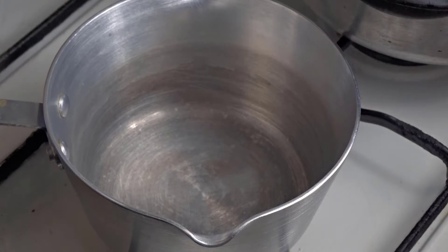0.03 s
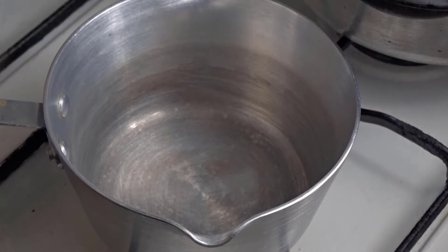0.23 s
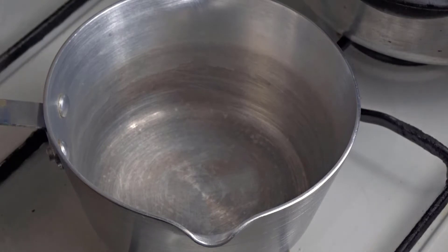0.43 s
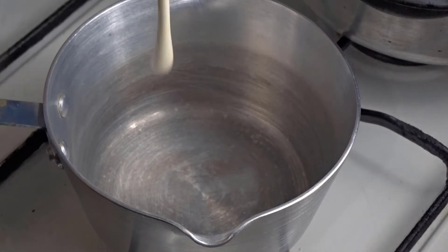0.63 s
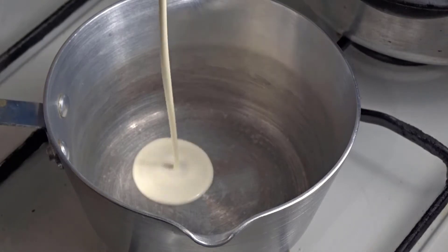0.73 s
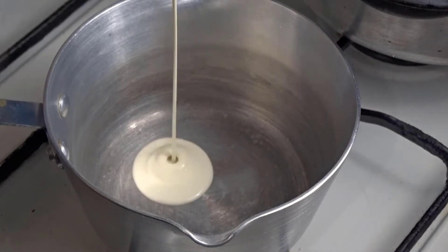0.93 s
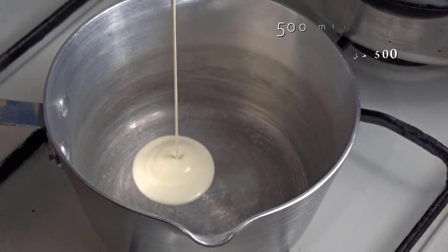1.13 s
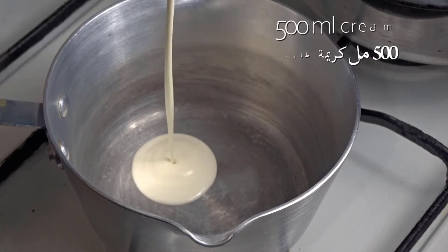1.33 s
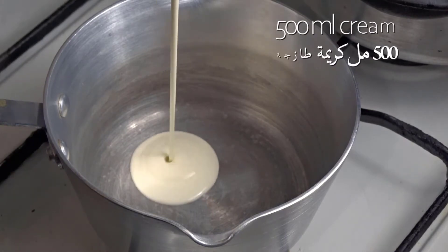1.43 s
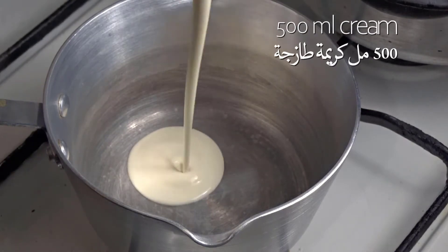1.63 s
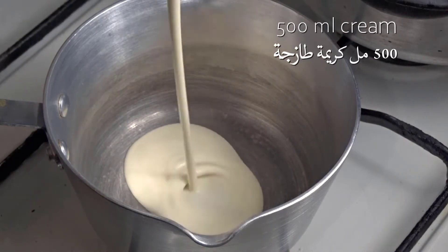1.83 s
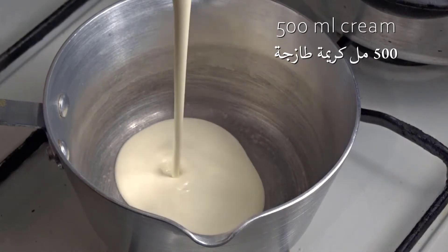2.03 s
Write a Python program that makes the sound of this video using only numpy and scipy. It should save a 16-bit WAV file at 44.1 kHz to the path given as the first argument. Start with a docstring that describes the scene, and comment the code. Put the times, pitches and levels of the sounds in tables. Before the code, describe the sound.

Cream pours into a steel pan, heard close up in a quiet kitchen. Cookware first clinks sharply at about 0.2 and 0.4 seconds, dragging briefly after each touch. From 0.6 seconds the cream patters softly with small bubble plops and wet ticks, growing fainter after 1.5 seconds. Light metal knocks come near 0.7 and 1 second. Steady fan-like noise and a low hum lie underneath.

```python
"""Cream poured into a steel pan

Close up in a quiet kitchen, cream patters into a pan: trapped bubbles plop, small ones tick.
Metal cookware clinks twice, drags briefly after each touch, then knocks lightly twice.
The metal sets off a microphone ring near 8.5 kHz. Fan-like noise and a low hum lie underneath."""
import sys
import numpy as np
from scipy import signal
from scipy.fft import rfft, irfft
from scipy.io import wavfile
from scipy.ndimage import uniform_filter1d

SR = 44100
rng = np.random.default_rng(int(sys.argv[2]) if len(sys.argv) > 2 else 0)


def generate_wav(sig):
    """Save sig (samples, or channels by samples) to the path in sys.argv[1] as 16-bit PCM at SR."""
    pcm = np.round(np.clip(np.atleast_2d(sig).T, -1, 1) * 32767).astype(np.int16)
    wavfile.write(sys.argv[1], SR, pcm)


N = 92610


# stream patter: time_s, level_db
POUR_LEVEL = [(.6, -64), (.67, -57.5), (.78, -60.5), (.95, -61.5), (1.05, -57.5), (1.2, -63.5),
              (1.38, -62.5), (1.55, -68), (2.1, -70)]
# pan resonances under the stream: centre_hz, width_hz, gain_db
POUR_RESONANCES = [(312, 120, 4.5), (475, 280, -1), (680, 210, -1), (1470, 520, -6.5), (3030, 640, -22)]
def pour():
    """Tiny splashes of thick cream excite the pan."""
    return excite(POUR_LEVEL, POUR_RESONANCES)


# plops: start_s, bubble_db, pitch_hz, t60_s, rise_s, splat_db
PLOP_EVENTS = [(0.2371, -39.5, 1394, .025, 0.0024, -47), (0.656, -46.5, 1615, 0.052, 0.0023, -56),
               (.760, -48, 1570, .03, 0.0025, -60), (1.169, -42, 1400, 0.032, 0.0011, -40.5),
               (1.21, -60, 1090, 0.035, 0.0025, -47.5), (1.3353, -35, 1484, 0.027, 0.0043, -47.5),
               (1.502, -54, 1500, 0.033, .002, -52)]
# pan floor modes, damped by cream: pitch_hz, gain_db, t60_s
PAN_MODES = [(436, 0.5, 0.031), (760, 4, 0.012), (1117, 7.5, 0.025), (1820, 0, 0.018)]
# splat spectrum: freq_hz, gain_db
SPLAT_SPECTRUM = [(60, -22), (250, 0), (450, -6.5), (900, -2), (1300, 3), (2500, -23), (4000, -19),
                  (8000, -45)]
def plops():
    """A trapped bubble rings in froth as the cream splats on the pan floor."""
    out = np.zeros(N)
    for start_s, bubble_db, pitch_hz, t60_s, rise_s, splat_db in PLOP_EVENTS:
        froth = hump(pitch_hz, octaves=0.13, skirt_db=-14)
        add(out, start_s, ring([(pitch_hz, bubble_db, t60_s)], rise_s))
        add(out, start_s, amp(bubble_db - 2) * burst(froth, t60_s, rise_s))
        add(out, start_s, amp(splat_db) * ring(PAN_MODES, rise_s))
        add(out, start_s, amp(splat_db - 2) * burst(spectrum(SPLAT_SPECTRUM), t60_s=0.09, rise_s=rise_s))
    return out


# wet ticks: start_s, gain_db, centre_hz
TICK_EVENTS = [(0.2081, -37.5, 2400), (0.2307, -34, 8500), (0.271, -44, 10300), (0.727, -43.5, 8060),
               (.766, -40, 7600), (.779, -49, 5930), (0.7995, -45, 8100), (.9437, -46.5, 8000),
               (1.0245, -47, 8200), (1.0504, -43, 8100), (1.0999, -32.5, 7600), (1.187, -44.5, 5400),
               (1.203, -49, 7000), (1.247, -52, 4900), (1.392, -45, 8150), (1.8292, -43, 7950),
               (2.0336, -43.5, 8500)]
def ticks():
    """Small bubbles tick, each with a faint tail."""
    out = np.zeros(N)
    for start_s, gain_db, centre_hz in TICK_EVENTS:
        colour = hump(centre_hz, octaves=0.25, skirt_db=-18)
        add(out, start_s, amp(gain_db - 1.5) * burst(colour, t60_s=0.01, rise_s=0.00074))
        add(out, start_s, amp(gain_db - 19) * burst(colour, t60_s=0.073, rise_s=0.0022))
    return out


# modes of the two points struck, plus the microphone's 8.5 kHz ring: pitch_hz, level_db, t60_s
FIRST_MODES = [(1090, -41, 0.057), (2530, -49, 0.02), (3410, -31, 0.027), (3755, -33.5, 0.036),
               (4810, -32, 0.029), (5770, -40, 0.056), (6980, -38, .04), (8060, -31, .03),
               (8495, -15.5, 0.04), (9200, -38, .025), (12800, -42, .04)]
SECOND_MODES = [(814, -35.5, 0.033), (929, -37, 0.046), (1487, -44, 0.063), (2490, -41, .04),
                (3074, -34.5, 0.098), (3780, -35.5, 0.047), (4680, -31, 0.021), (4773, -27, 0.028),
                (5900, -36.5, 0.039), (7660, -32, .03), (8580, -13.5, 0.024), (8400, -29, 0.016),
                (9630, -24, 0.019), (10920, -33, 0.025), (12650, -31, 0.02)]
# crack spectra: freq_hz, gain_db
FIRST_SPECTRUM = [(60, -45), (250, -13), (1000, 0.5), (1400, -14), (2200, 0), (2800, -4.5), (3500, 0),
                  (4200, -6.5), (4900, 3.5), (6200, -8), (7300, 0.5), (9500, 1.5), (11400, -18),
                  (12700, -17), (16000, -25)]
SECOND_SPECTRUM = [(60, -40), (350, -7), (850, 1), (1250, -13), (1900, -14), (3000, -16), (4800, -1.5),
                   (6300, -6), (7600, 5), (9900, 6), (11000, 0), (12500, 2), (13500, -5), (16000, -2)]
# clinks: start_s, crack_db, crack_t60_s, ring_gain_db, ring_rise_s
CLINK_EVENTS = [(0.1529, -25.5, 0.026, 1, 0.0058), (.3713, -22.5, 0.019, -0.5, 0.0024)]
# bounces of the second clink: start_s, gain_db
CHATTER = [(.3825, -31), (0.3863, -16.5), (0.3996, -21)]
def clinks():
    """Struck metal cracks, rattles, rings and sets off the microphone's ring; clink two chatters."""
    out = np.zeros(N)
    points = [(spectrum(FIRST_SPECTRUM), FIRST_MODES), (spectrum(SECOND_SPECTRUM), SECOND_MODES)]
    for event, (colour, modes) in zip(CLINK_EVENTS, points):
        start_s, crack_db, crack_t60_s, ring_gain_db, ring_rise_s = event
        crack = burst(colour, crack_t60_s, rise_s=0.00026)
        rattle = amp(-20) * burst(colour, t60_s=0.12, rise_s=0.004)
        add(out, start_s, amp(crack_db) * (crack + rattle))
        add(out, start_s, amp(ring_gain_db) * ring(modes, ring_rise_s))
    for start_s, gain_db in CHATTER:
        add(out, start_s, amp(gain_db) * ring(SECOND_MODES, rise_s=0.0025))
    return out


# drag after the first clink, scrape after the second: time_s, level_db
DRAG_LEVEL = [(.155, -67), (.165, -52), (.187, -46), (.2, -54), (.215, -49.5), (.25, -55.5), (.275, -54.5),
              (.3, -50.5), (.33, -56.5), (.365, -57)]
SCRAPE_LEVEL = [(.372, -63), (.38, -48), (.405, -47.5), (.43, -52), (.447, -44.5), (.47, -48.5),
                (.495, -47.5), (.515, -43), (.54, -46.5), (.565, -58), (.62, -71)]
# scraped metal resonances, plus the microphone's ring near 8.5 kHz: centre_hz, width_hz, gain_db
DRAG_RESONANCES = [(1930, 130, -2), (2670, 220, 0), (3260, 880, -5.5), (4790, 250, -6.5), (5860, 150, -4),
                   (7230, 280, -4.5), (8430, 60, 9), (8900, 500, -15)]
SCRAPE_RESONANCES = [(960, 71, 1.5), (2894, 40, 5), (4600, 360, -7.5), (5530, 1000, -6.5), (6800, 700, -6),
                     (7480, 180, -6), (8260, 66, 8), (8650, 33, 12), (9600, 140, -25), (10700, 290, -34)]
# gliding scrape resonances: time_s, centre_hz, level_db
LOW_GLIDE = [(.385, 1510, -68), (.405, 1490, -54), (.447, 1650, -50), (.48, 1570, -55), (.515, 1600, -51),
             (.54, 1640, -54), (.575, 1660, -67)]
HIGH_GLIDE = [(.385, 3100, -59), (.435, 3100, -59), (.445, 3130, -44.5), (.48, 3120, -49),
              (.505, 3040, -55), (.525, 3430, -52.5), (.545, 3270, -52.5), (.57, 3250, -63)]
# scrape catches: start_s, level_db
CATCH_EVENTS = [(.4447, -37.5), (.5112, -40)]
def scraping():
    """Metal drags on metal in tiny slips and catches twice; the drag carries no bass."""
    out = excite(DRAG_LEVEL, DRAG_RESONANCES) + excite(SCRAPE_LEVEL, SCRAPE_RESONANCES)
    out += rasp(LOW_GLIDE, width_hz=190) + rasp(HIGH_GLIDE, width_hz=420)
    for start_s, level_db in CATCH_EVENTS:
        add(out, start_s, amp(level_db) * burst(spectrum(SECOND_SPECTRUM), t60_s=0.013, rise_s=0.00061))
    return signal.sosfilt(signal.butter(2, 450, "high", fs=SR, output="sos"), out)


def rasp(glide, width_hz):
    """Slips excite one resonance that glides as the contact point moves."""
    time_s, centre_hz, level_db = np.transpose(glide)
    glide_hz = np.interp(np.arange(N) / SR, time_s, centre_hz)
    carrier = np.exp(2j * np.pi * np.cumsum(glide_hz) / SR)
    baseband = signal.sosfilt(signal.butter(2, width_hz / 2, fs=SR, output="sos"), grains() / carrier)
    return unit((baseband * carrier).real) * envelope(time_s, level_db)


# knocks: start_s, thud_db, ring_gain_db
KNOCK_EVENTS = [(.6571, -40.5, -25), (0.9656, -34.5, 0)]
# thud spectrum: freq_hz, gain_db
THUD_SPECTRUM = [(60, -30), (330, 2), (600, -6), (1200, -3), (1800, -6), (2350, -9), (2900, -7),
                 (4800, -9.5), (6900, -3), (8400, 0), (9600, -8.5), (12500, -13.5), (16000, -24)]
# ring after a knock: pitch_hz, level_db, t60_s
KNOCK_RING = [(332, -42, 0.08), (1180, -58, .03), (1505, -43, 0.049), (1817, -40.5, 0.06),
              (2380, -41, 0.044), (8200, -39, .02), (8700, -50, .02)]
def knocks():
    """Light touches of the cookware: a dull thud, its tail and a short ring."""
    out = np.zeros(N)
    colour = spectrum(THUD_SPECTRUM)
    for start_s, thud_db, ring_gain_db in KNOCK_EVENTS:
        add(out, start_s, amp(thud_db) * burst(colour, t60_s=0.025, rise_s=0.0007))
        add(out, start_s, amp(thud_db - 11.5) * burst(colour, t60_s=0.11, rise_s=0.003))
        add(out, start_s, amp(ring_gain_db) * ring(KNOCK_RING, rise_s=0.00085))
    return out


# stereo width by frequency, nearly mono at 4-7 kHz: freq_hz, side_gain_db
STEREO_WIDTH = [(100, -16), (400, -7), (1000, -9), (2000, -6), (3200, -8), (5500, -29), (8500, -14),
                (12000, -8.5)]
def kitchen(direct, t60_s=0.19, wet_db=-9.5, taps_per_s=3000):
    """Adds a short stereo tail of sparse reflections."""
    t = np.arange(SR // 2) / SR
    signs = rng.choice([-1, 1], (2, len(t)))
    arrivals = (rng.random((2, len(t))) < taps_per_s / SR) * (t > 0.003)
    taps = signs * arrivals * fade(t, t60_s)
    mid, side = signal.fftconvolve(direct[None], taps / np.linalg.norm(taps[0]), axes=1)[:, :N]
    side = irfft(rfft(side) * amp(read(STEREO_WIDTH, np.fft.rfftfreq(N, 1 / SR))), N)
    return direct + amp(wet_db) * np.array([mid + side, mid - side])


# fan-like noise spectrum: freq_hz, gain_db
AIR_SPECTRUM = [(15, -23), (28, -10.5), (50, -12), (85, -24.5), (115, -10.5), (155, -19.5), (185, -3.5),
                (225, 0.5), (255, -3.5), (300, -4), (370, -11.5), (440, -7), (620, -8.5), (760, -8),
                (850, -4.5), (970, -5), (1140, -3), (1380, -15.5), (2550, -15), (2950, -23), (3700, -22.5),
                (4900, -32.5), (6300, -31.5), (7300, -24.5), (8200, -24.5), (8500, -17.5), (8800, -22.5),
                (10000, -25.5), (14500, -30.5), (16000, -37)]
# left-right likeness: freq_hz, correlation
AIR_CORRELATION = [(30, 0.98), (200, 1), (500, 0.86), (1000, 0.91), (1800, 0.73), (3000, 0.74),
                   (5000, 0.96), (8500, 0.96), (13000, 0.95)]
def air(level_db=-52.5, ripple_db=1):
    """Steady fan-like noise, faintly rippling, almost the same in both channels."""
    frames, hz = N // 512 + 5, np.fft.rfftfreq(2048, 1 / SR)
    mid_re, mid_im, side_re, side_im, ripple = rng.standard_normal((frames, len(hz), 5)).T
    ripple = uniform_filter1d(ripple, size=24, axis=0)  # across frequency
    ripple = unit(uniform_filter1d(ripple, size=6, axis=1))  # across time
    correlation = read(AIR_CORRELATION, hz)[:, None]
    mid = np.sqrt(1 + correlation) * (mid_re + 1j * mid_im)
    side = np.sqrt(1 - correlation) * (side_re + 1j * side_im)
    gain = amp(read(AIR_SPECTRUM, hz)[:, None] + ripple_db * ripple)
    _, noise = signal.istft(np.array([mid + side, mid - side]) * gain, nperseg=2048, noverlap=1536)
    return amp(level_db) * unit(noise[:, :N])


# hum lines: pitch_hz, level_db, width_hz
HUM_LINES = [(222.3, -63, 5.5), (280, -69, 4.6), (421.6, -69, 6.4), (956, -70, 5.2), (1054, -63, 19),
             (1140, -65, 25)]
def hum():
    """Narrow bands of noise make a wavering low hum."""
    hz = np.fft.rfftfreq(N, 1 / SR)
    out = np.zeros(N)
    for pitch_hz, level_db, width_hz in HUM_LINES:
        band = np.exp(-((hz - pitch_hz) / width_hz) ** 2)
        out += amp(level_db) * shaped_noise(band)
    return out


def amp(db):
    """Decibels to gain."""
    return 10 ** (np.asarray(db) / 20)


def unit(x):
    """Scales to rms 1."""
    return x / np.sqrt(np.mean(x ** 2) + 1e-20)


def add(mix, start_s, sound):
    """Mixes a sound in at start_s."""
    part = mix[round(start_s * SR):][:len(sound)]
    part += sound[:len(part)]


def fade(t, t60_s):
    """Falls by 60 dB in t60_s."""
    return np.exp(-np.log(1000) * t / t60_s)


def envelope(time_s, level_db):
    """Gain along a level curve, silent outside it."""
    return amp(np.interp(np.arange(N) / SR, time_s, level_db, left=-120, right=-120))


def read(points, hz):
    """Interpolates on a log-frequency axis."""
    freq_hz, value = np.transpose(points)
    return np.interp(np.log(hz + 1), np.log(freq_hz + 1), value)


def spectrum(points):
    """Colour through (freq_hz, gain_db) points."""
    return lambda hz: read(points, hz)


def hump(centre_hz, octaves, skirt_db):
    """Colour with one peak on a wider skirt."""
    def colour(hz):
        offset_oct = np.log2((hz + 1) / centre_hz)
        peak = np.exp(-0.5 * (offset_oct / octaves) ** 2)
        skirt = amp(skirt_db) / (1 + offset_oct ** 4)
        return 20 * np.log10(peak + skirt)
    return colour


def shaped_noise(magnitude):
    """Random-phase noise at rms 1."""
    return unit(irfft(magnitude * np.exp(2j * np.pi * rng.random(len(magnitude)))))


def burst(colour, t60_s, rise_s):
    """Dying puff of noise; colour maps Hz to dB."""
    t, hz = np.arange(8192) / SR, np.fft.rfftfreq(8192, 1 / SR)
    return shaped_noise(amp(colour(hz))) * fade(t, t60_s) * np.minimum(t / rise_s, 1)


def ring(modes, rise_s):
    """Damped sine modes with a smooth onset."""
    t = np.arange(SR // 4) / SR
    onset = np.sin(np.pi / 2 * np.minimum(t / rise_s, 1)) ** 2
    return onset * sum(amp(db) * fade(t, t60_s) * np.sin(2 * np.pi * hz * t) for hz, db, t60_s in modes)


def grains(rate_per_s=2200, spread_db=2):
    """Dense tiny impulses of uneven size."""
    size = amp(spread_db * np.minimum(rng.exponential(1, N), 4))
    hits = rng.random(N) < rate_per_s / SR
    return unit(hits * rng.choice([-1, 1], N) * size)


def excite(level_curve, resonances):
    """Tiny slips or splashes drive a bank of resonances."""
    hz = np.fft.rfftfreq(N, 1 / SR) + 1
    response = sum(amp(gain_db) / (1 + 1j * (hz ** 2 - centre_hz ** 2) / (hz * width_hz))
                   for centre_hz, width_hz, gain_db in resonances)
    response /= np.sqrt(np.mean(abs(response) ** 2))
    drive = grains() * envelope(*np.transpose(level_curve))
    return irfft(rfft(drive) * response, N)


def scene():
    """Cookware and cream in the kitchen, over the background."""
    cookware = clinks() + scraping() + knocks()
    cream = pour() + plops() + ticks()
    return kitchen(cookware + cream) + air() + hum()


def record(dry):
    """Low-pass at 16 kHz."""
    lowpass = signal.firwin(511, 16000, window=("kaiser", 9), fs=SR)
    return signal.oaconvolve(dry, lowpass[None], "same")


dry = scene()
out = record(dry)
generate_wav(out)
```